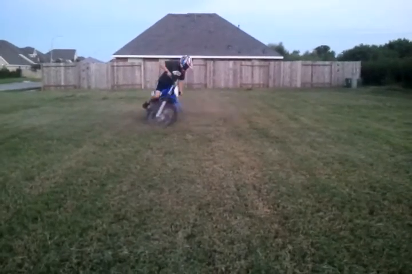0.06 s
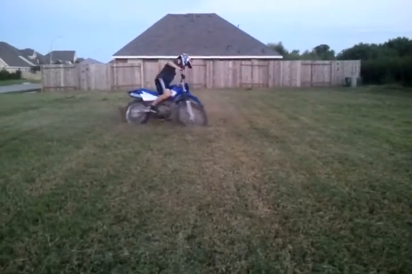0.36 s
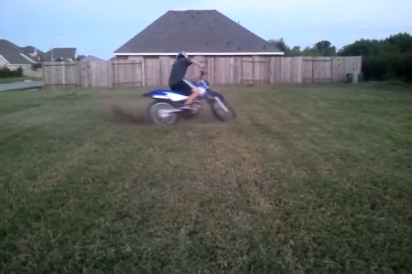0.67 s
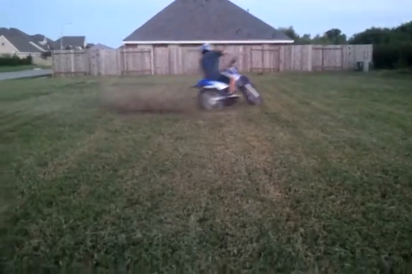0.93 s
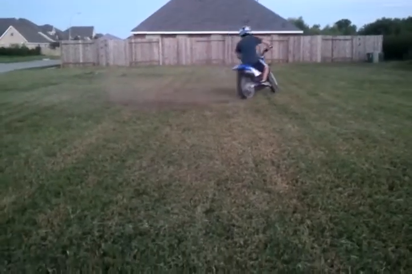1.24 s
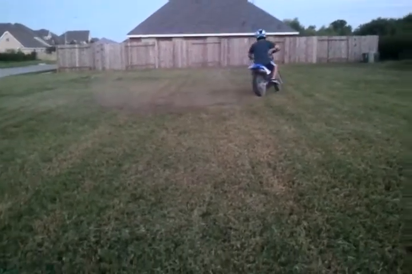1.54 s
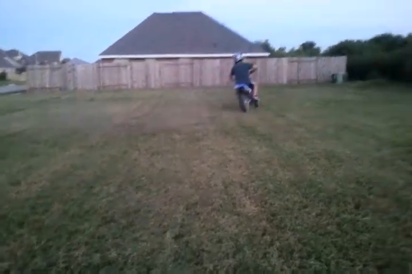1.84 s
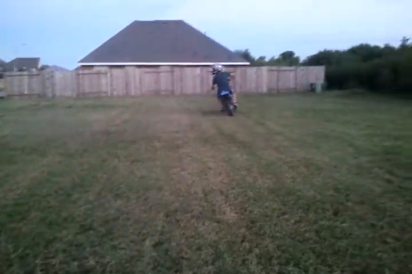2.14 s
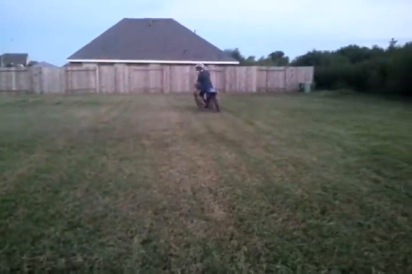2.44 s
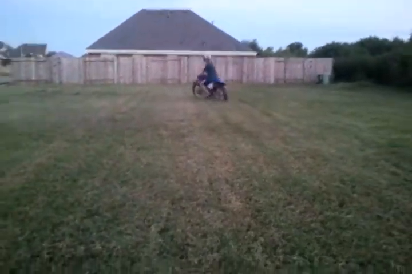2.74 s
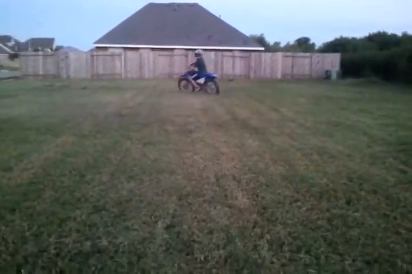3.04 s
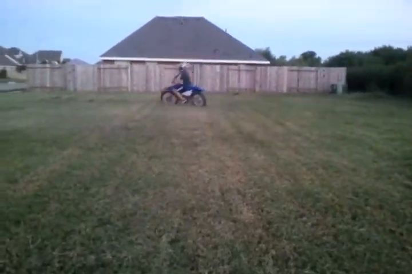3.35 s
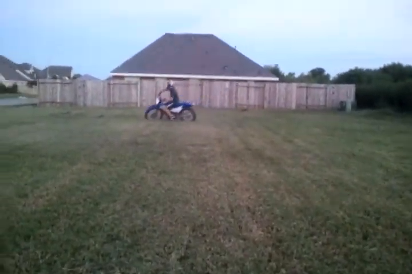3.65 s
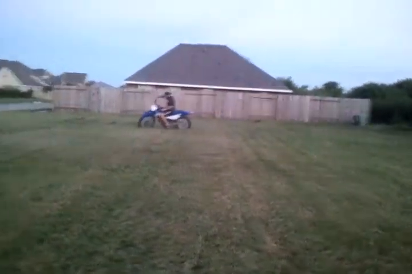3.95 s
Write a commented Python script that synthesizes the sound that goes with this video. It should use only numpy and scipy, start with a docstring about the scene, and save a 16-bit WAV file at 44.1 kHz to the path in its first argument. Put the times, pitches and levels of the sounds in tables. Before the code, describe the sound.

A dirt bike revs with a harsh, whining rasp, drops back, crackles on two throttle blips and putters away with a light clatter. The yard adds a short echo, and the small microphone overloads on the loudest peaks.

```python
"""A harsh, whining rasp comes first: a single-cylinder four-stroke dirt bike spins its rear wheel on a lawn at
full throttle. It drops back, is blipped twice, pops faintly, a stone clacks once, and it potters away. Each
firing rings the exhaust pipe, bursts of gas crack on the blips, and valves and chain clatter throughout. A
fence and the yard echo the rasp, whine, pops and clatter; the low exhaust notes stay dry. A small microphone
overloads on the loudest peaks."""
import sys
import numpy as np
from scipy import signal
from scipy.fft import rfft, irfft
from scipy.io import wavfile

SR = 44100
rng = np.random.default_rng(int(sys.argv[2]) if len(sys.argv) > 2 else 0)


def materialize(psi):
    """Save the field psi as 16-bit PCM at rate SR to the path in sys.argv[1].

    A 1-D psi becomes a single channel; in a 2-D psi each row is a channel.
    """
    bounded = np.clip(np.atleast_2d(psi).T, -1, 1)
    quanta = np.round(bounded * 32767).astype(np.int16)
    wavfile.write(sys.argv[1], SR, quanta)


N = 176400

# Engine speed: t/s, firing rate/Hz
FIRING_RATE = [(0.0, 68.02), (0.42, 65.28), (0.73, 57.99), (0.86, 43.24), (1.03, 32.9), (1.19, 29.68),
               (1.37, 33.2), (1.47, 31.5), (1.6, 38.31), (1.7, 35.6), (1.82, 33.7), (2.4, 32.6),
               (2.56, 31.4), (2.81, 30.1), (2.95, 31.3), (3.2, 29.1), (3.4, 29.3), (3.78, 27.9),
               (4.0, 28.9)]
# Valve and piston knocks: delay after the firing/cycles, level/dB
KNOCKS = [(0, 4.5), (0.231, 1), (0.499, -3.5), (0.771, -9.5)]
# Loudness of the open throttle: t/s, rasp/dB, snarl/dB
THROTTLE_LEVELS = [(0, -13, -23.5), (.12, -13, -22.5), (.45, -10, -21), (.72, -14, -19.5),
                   (.82, -16.5, -25), (.92, -19.5, -26.5), (1.02, -28, -32), (1.15, -88, -62)]
# Tone of the bright rasp: f/Hz, level/dB
RASP_COLOUR = [(300, -40.5), (650, -12), (1350, -13), (1700, -1), (2150, 0), (2430, -3.5), (2650, 1.5),
               (3300, -1), (3700, -5.5), (4020, -0.5), (4450, -12.5), (5000, 0), (5350, -11), (5600, -6),
               (6300, -7.5), (7000, -19)]
# Tone of the lower snarl: f/Hz, level/dB
SNARL_COLOUR = [(50, -26.5), (300, -7), (600, -10.5), (800, -5.5), (1020, -0.5), (1190, 3), (1400, -9),
                (2500, -36.5)]
# Gears whining under load: pitch/firing rate, peak t/s, swell time/s, level/dB
GEAR_WHINES = [(30.3, 0.079, 0.062, -17.5), (39.97, 0.35, 0.1, -19), (39.5, 0.7, .05, -20),
               (44.8, 0.5, 0.039, -21), (78, 0.463, 0.038, -25), (95, 0.62, 0.065, -24)]
# Loudness of the exhaust's three notes: t/s, boom/dB, drone/dB, bark/dB
EXHAUST_LEVELS = [(0, -21.5, -35, -45), (.4, -25.5, -26.5, -42), (.6, -29.5, -28.5, -27.5),
                  (.74, -34.5, -36, -28), (.77, -22, -24, -29.5), (.98, -25, -25, -43),
                  (1.006, -41, -32.5, -47), (1.024, -26, -27.5, -40.5), (1.165, -30.5, -43.5, -32),
                  (1.19, -26, -39, -23.5), (1.33, -26.5, -44, -24.5), (1.38, -30, -33.5, -36.5),
                  (1.47, -25.5, -31.5, -42), (1.502, -24.5, -33.5, -24.5), (1.6, -29, -25, -25.5),
                  (1.675, -27, -38, -35.5), (1.705, -34, -40, -42), (1.79, -30, -39, -47),
                  (1.84, -29.5, -41, -33), (2.04, -26.5, -35, -49), (2.82, -34.5, -39.5, -40.5),
                  (2.92, -33, -45, -32.5), (3.04, -35, -42, -47), (4, -37, -47, -42.5)]
# The pipe's low boom: f/Hz, level/dB, t60/s (the time to fade by 60 dB)
BOOM_MODES = [(137.5, 1.5, 0.25), (155, -9, 0.012)]
# The pipe's drone: f/Hz, level/dB, t60/s
DRONE_MODES = [(255.8, 1.5, .11), (384, -13.5, 0.11)]
# The pipe's short bark: f/Hz, level/dB, t60/s
BARK_MODES = [(286, -0.5, 0.067), (321, -6, 0.026)]
# Loudness of the moving parts: t/s, clatter/dB, valve tap/dB, chain and tyre hiss/dB
RUNNING_LEVELS = [(0, -26.5, -42, -27.5), (1.08, -39.5, -39, -27.5), (1.4, -32.5, -60, -31.5),
                  (1.68, -38, -32.5, -27.5), (1.82, -34.5, -35, -31), (2.66, -38, -31, -33),
                  (2.82, -38.5, -40, -33.5), (2.93, -36, -46, -34), (3.25, -39.5, -55, -35.5),
                  (4, -38, -53, -34.5)]
# Tone of the engine clatter: f/Hz, level/dB
CLATTER_COLOUR = [(40, -62), (150, 2), (400, 3.5), (600, -12.5), (900, 5), (1160, 4), (1300, -6), (1850, 7),
                  (2350, -6), (2650, 5.5), (3200, -16), (4500, -17), (7000, -49)]
# Ring of the engine casing: f/Hz, level/dB, t60/s
CASING_MODES = [(1165, 0, .07), (1920, -3, .04), (2600, 0, .04), (4030, -1, .05), (4350, -4, .03),
                (5600, -4, .025)]
# Ring of the valve tap: f/Hz, level/dB, t60/s
TAP_MODES = [(2070, -11, 0.043), (2548, -5, 0.054), (2630, -6.5, 0.024), (3960, -8.5, 0.046),
             (2300, -3, .005)]
# Tone of the chain and tyre hiss: f/Hz, level/dB
HISS_COLOUR = [(50, -37.5), (500, -10), (2500, 2), (3700, -0.5), (4050, -1), (5000, -2), (5600, -0.5),
               (6600, -8), (7200, -19)]
# Tone of the outdoor background: f/Hz, level/dB
AIR_COLOUR = [(20, -24), (70, -22.5), (200, 12.5), (600, 6), (7000, -61)]
# Ringing metal parts: f/Hz, bandwidth/Hz, peak t/s, swell time/s, level/dB
METAL_RINGS = [(930, 116, 0.5, 0.061, -21.5), (3290, 220, 0.3, 0.064, -19.5), (5680, 270, 0.73, 0.085, -26),
               (4340, 290, 1.4, 0.36, -35.5), (2585, 170, 1.61, 0.15, -35.5), (2700, 220, 2.78, 0.36, -42)]
# Exhaust pops on a blip of the throttle: t/s, thud/dB, crack/dB
POPS = [(1.186, -5, -1.5), (1.219, 5.5, 7.5), (1.252, 0, 4.5), (1.283, 5, 7.5), (1.314, 4, 4.5),
        (1.499, 4, 9.5), (1.527, 8.5, 8.5), (1.556, 9, 10), (1.583, 7, 9), (1.608, 0.5, 4),
        (2.891, -13, -1.5), (2.926, -10, -6)]
# Tone of a pop's thud: f/Hz, level/dB
THUD_COLOUR = [(35, -39), (80, 5.5), (500, -9), (1100, 2), (1800, 3), (4000, -27)]
# Tone of a pop's crack: f/Hz, level/dB
CRACK_COLOUR = [(800, -38), (2100, 5), (3700, 2), (4400, 3.5), (7500, -19.5)]
# Tone of the clack: f/Hz, level/dB
CLACK_COLOUR = [(800, -22), (2400, -11), (3400, 6), (4200, -2), (7000, -23)]

TIME = np.arange(N) / SR


def undb(db):
    """Turn decibels into a gain."""
    return 10 ** (np.asarray(db) / 20)


def curve(table, column=1):
    """One column of a table, joined by straight lines in time."""
    rows = np.array(table)
    return np.interp(TIME, rows[:, 0], rows[:, column])


def swell(peak_s, swell_s):
    """A bell-shaped rise and fall."""
    return np.exp(-.5 * ((TIME - peak_s) / swell_s) ** 2)


def wander(rate_hz):
    """Glide between random values, rate_hz of them a second."""
    knots = rng.standard_normal(2000)
    return 1.2 * np.interp(TIME * rate_hz, np.arange(len(knots)), knots)


def steady(x):
    """Hold the short-term level at 1."""
    window = np.hanning(SR // 8)
    power = signal.fftconvolve(x * x, window, "same") / signal.fftconvolve(np.ones(N), window, "same")
    return x / np.sqrt(power + 1e-12)


def through(x, response):
    """Let every sample of x set off a copy of the response."""
    return signal.fftconvolve(x, response)[:N]


def unit(x):
    """Scale to a total energy of 1."""
    return x / np.linalg.norm(x)


def colour(x, points, size=2048):
    """Shape the tone along (Hz, dB) points; white noise keeps its power."""
    hz, db = np.array(points).T
    grid_hz = np.arange(size + 1) * SR / 2 / size + 1
    gain = undb(np.interp(np.log(grid_hz), np.log(hz), db))
    # Fold the filter in time so that it never sounds before its input.
    cepstrum = irfft(np.log(gain))
    cepstrum[1:size] *= 2
    cepstrum[size + 1:] = 0
    return through(x, unit(irfft(np.exp(rfft(cepstrum)))[:size]))


def band(x, low_hz, high_hz):
    """Keep the sound between two frequencies."""
    return signal.sosfilt(signal.butter(2, [low_hz, high_hz], "band", fs=SR, output="sos"), x)


def fade(decay_s):
    """A quarter-second fade that falls to 37% after decay_s."""
    return np.exp(-np.arange(SR // 4) / SR / decay_s)


def dense_ring(x, decay_s):
    """Ring so many close notes that they blur into fading noise."""
    return through(x, unit(fade(decay_s) * rng.standard_normal(SR // 4)))


def ring(x, modes):
    """Ring a few clear, fading notes."""
    t = TIME[:SR // 4]
    notes = sum(undb(db) * np.cos(2 * np.pi * hz * t) * fade(t60 / np.log(1000)) for hz, db, t60 in modes)
    return through(x, unit(notes))


def strokes(cycles, phase, scatter_db, jitter_s=.00007):
    """One slightly uneven pulse per engine cycle, `phase` cycles after the firing."""
    timing, force = rng.standard_normal((200, 2)).T
    at = np.interp(np.arange(200) + phase, cycles, np.arange(N), right=2 * N) + jitter_s * SR * timing
    inside = (at >= 0) & (at < N - 1)
    at, strength = at[inside], undb(scatter_db * force[inside])
    pulses = np.zeros(N)
    pulses[at.astype(int)] = strength * (1 - at % 1)  # two samples share each pulse
    pulses[at.astype(int) + 1] = strength * (at % 1)
    return pulses


def knocks(cycles, scatter_db):
    """Valves and piston knock four times in each cycle."""
    return sum(undb(db) * strokes(cycles, phase, scatter_db) for phase, db in KNOCKS)


def puffs(pulses, decay_s):
    """A short burst of noise after each pulse."""
    return steady(through(pulses, fade(decay_s)) * rng.standard_normal(N))


def buzz(cycles, change_hz=4.95, size=256):
    """A rattle that repeats with each engine cycle and slowly changes its pattern."""
    place = (cycles % 1) * size
    rattle = np.zeros(N)
    for _ in range(4):
        weight = wander(change_hz)
        pattern = signal.resample(rng.standard_normal(size), size * 8)
        rattle += weight * np.interp(place, np.arange(size * 8) / 8, pattern)
    return steady(rattle)


def full_throttle(cycles):
    """Hard-driven metal buzzes in step with the engine while gas tears out in puffs."""
    hits = knocks(cycles, scatter_db=4)
    metal = buzz(cycles) + undb(-4.5) * steady(dense_ring(hits, .007))
    roar = steady(metal + undb(2.5) * puffs(hits, .014))
    rasp = steady(colour(roar, RASP_COLOUR)) * undb(curve(THROTTLE_LEVELS, 1))
    snarl = steady(colour(roar, SNARL_COLOUR)) * undb(curve(THROTTLE_LEVELS, 2))
    return rasp + snarl


def gear_whine(cycles, flutter_hz=130):
    """Gears under load sing brief, rough notes that follow the engine speed."""
    whine = np.zeros(N)
    for multiple, peak_s, swell_s, db in GEAR_WHINES:
        flutter = wander(flutter_hz) + 1j * wander(flutter_hz)  # blurs both level and pitch
        note = np.real(flutter * np.exp(2j * np.pi * multiple * cycles))
        whine += undb(db) * swell(peak_s, swell_s) * note
    return whine


def exhaust(cycles):
    """Firings ring a boom, a drone and a bark in the pipe; intake gulps add to the drone."""
    # Start the pulse slightly early so the filtered notes peak on the firing.
    firings = strokes(cycles, phase=-.121, scatter_db=.6)
    gulps = strokes(cycles, phase=.2405, scatter_db=1)
    boom = band(ring(firings, BOOM_MODES), 80, 194)
    drone = band(ring(firings + undb(-7.5) * gulps, DRONE_MODES), 203, 344)
    bark = band(ring(firings, BARK_MODES), 242, 352)
    return sum(steady(layer) * undb(curve(EXHAUST_LEVELS, column))
               for column, layer in enumerate((boom, drone, bark), 1))


def running_gear(cycles):
    """Knocks clatter and ring the casing, a valve taps once per cycle, and chain and tyres hiss."""
    hits = knocks(cycles, scatter_db=2)
    rattle = steady(dense_ring(hits, .0094)) + undb(4.5) * puffs(hits, .021)
    casing = steady(band(ring(puffs(hits, .0025), CASING_MODES), 900, 6500))
    clatter = steady(colour(rattle, CLATTER_COLOUR)) + undb(-8) * casing
    valve_hits = strokes(cycles, phase=.42, scatter_db=.1)
    tap = band(steady(ring(valve_hits, TAP_MODES)), 1100, 3700)
    rustle = puffs(hits, .041) + undb(-8.5) * steady(dense_ring(hits, .0097))
    hiss = steady(colour(rustle, HISS_COLOUR))
    return sum(layer * undb(curve(RUNNING_LEVELS, column))
               for column, layer in enumerate((clatter, tap, hiss), 1))


def echoes(bike, fence_delay_s=.075, yard_t60_s=.42):
    """The fence sends back one echo and the yard adds a short, blurred tail."""
    fence = np.interp(TIME - fence_delay_s, TIME, bike, left=0)
    yard = band(dense_ring(bike, yard_t60_s / np.log(1000)), 510, 8400)
    return undb(-14.5) * fence + undb(-7.5) * yard


def ringing_metal(cycles):
    """Knocks ring metal parts whose notes swell and fade as the bike turns."""
    shake = puffs(knocks(cycles, scatter_db=1.5), .0035) + undb(-3) * buzz(cycles)
    return sum(undb(db) * swell(peak_s, swell_s) * steady(band(shake, hz - width / 2, hz + width / 2))
               for hz, width, peak_s, swell_s, db in METAL_RINGS)


def pops(crack_s=.0016, tail_s=.011):
    """On a blip of the throttle, single firings leave the pipe as a thud and a sharp burst of gas."""
    thud, crack = np.zeros(N), np.zeros(N)
    envelope = fade(crack_s) + undb(-12) * fade(tail_s)
    for at_s, thud_db, crack_db in POPS:
        pulse = signal.unit_impulse(N, int(at_s * SR))
        gas = through(pulse, unit(envelope * rng.standard_normal(SR // 4)))
        thud += undb(thud_db) * (pulse + gas) / np.sqrt(2)
        crack += undb(crack_db) * gas
    return colour(thud, THUD_COLOUR) + colour(crack, CRACK_COLOUR)


def clack(at_s=3.543, rebound_s=.005, decay_s=.0033):
    """A stone is struck, clacks and rebounds."""
    age = TIME - at_s
    envelope = sum(undb(db) * (age > lag) * np.exp(-abs(age - lag) / decay_s)
                   for lag, db in [(0, -11), (rebound_s, 3)])
    return undb(-1.5) * colour(unit(envelope * rng.standard_normal(N)), CLACK_COLOUR)


def scene():
    """Mix the bike and its echoes with the echo-free exhaust notes and faint outdoor air."""
    cycles = np.cumsum(curve(FIRING_RATE)) / SR  # engine cycles counted so far
    bike = full_throttle(cycles) + gear_whine(cycles) + pops()
    bike += ringing_metal(cycles) + running_gear(cycles) + clack()
    reflections = echoes(bike)
    air = undb(-56) * colour(rng.standard_normal(N), AIR_COLOUR)
    return (bike + exhaust(cycles) + reflections + air)[None]


def record(dry, overload=.7, ceiling=.74):
    """The microphone flattens loud peaks; bass and treble are cut, and what overshoots is chopped off."""
    bass_cut = signal.butter(4, 56, "high", fs=SR, output="sos")
    treble_cut = signal.ellip(8, .3, 60, 7350, fs=SR, output="sos")
    final_cut = signal.ellip(8, .3, 60, 15800, fs=SR, output="sos")
    flattened = dry / (1 + (dry / overload) ** 6) ** (1 / 6)
    narrow = signal.sosfilt(treble_cut, signal.sosfilt(bass_cut, flattened))
    return signal.sosfilt(final_cut, np.clip(narrow, -ceiling, ceiling))


dry = scene()
out = record(dry)
materialize(out)
```